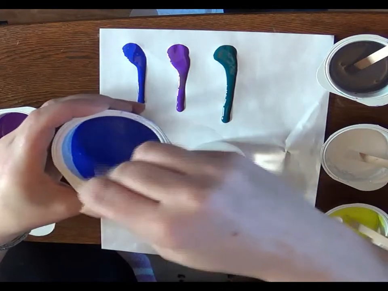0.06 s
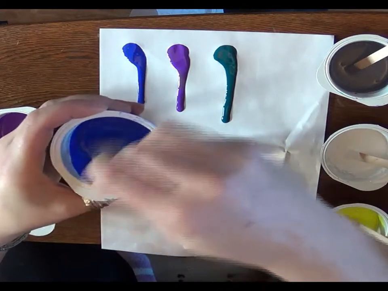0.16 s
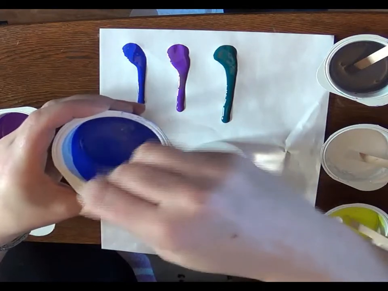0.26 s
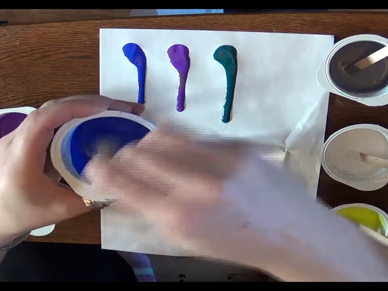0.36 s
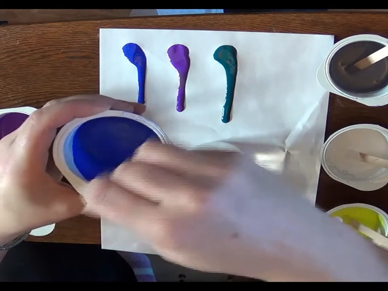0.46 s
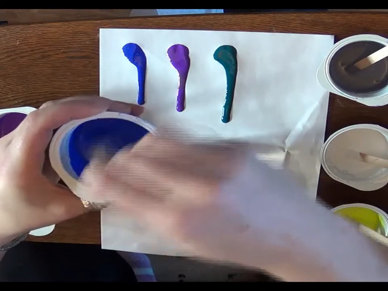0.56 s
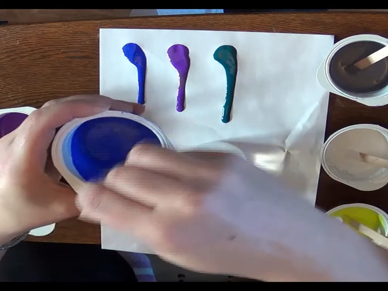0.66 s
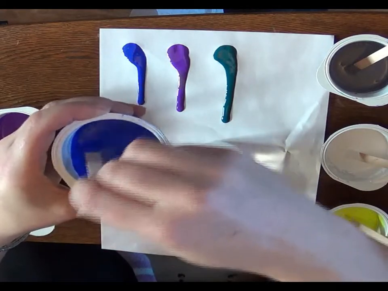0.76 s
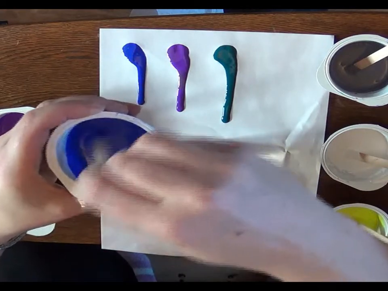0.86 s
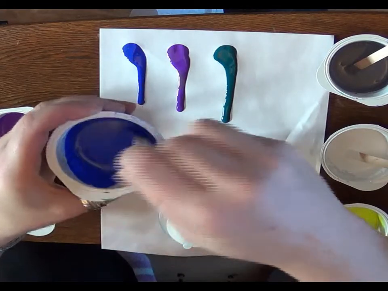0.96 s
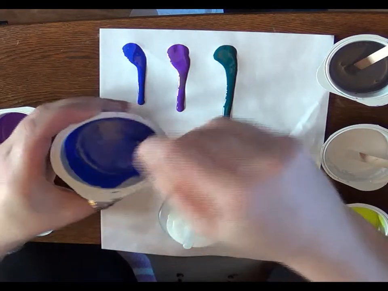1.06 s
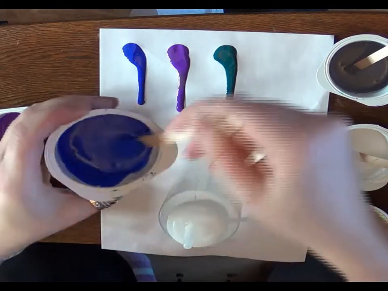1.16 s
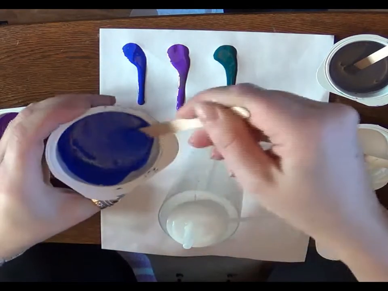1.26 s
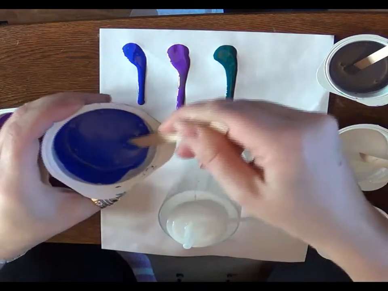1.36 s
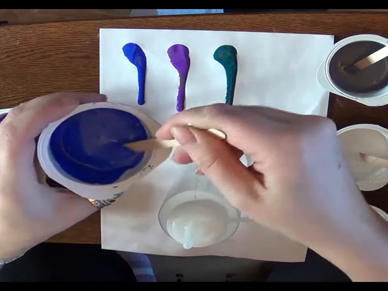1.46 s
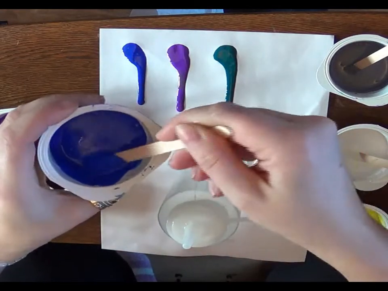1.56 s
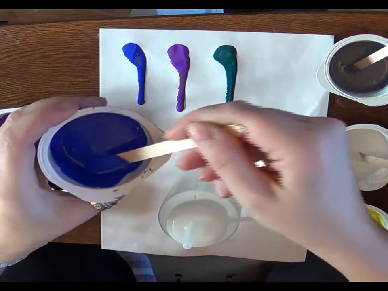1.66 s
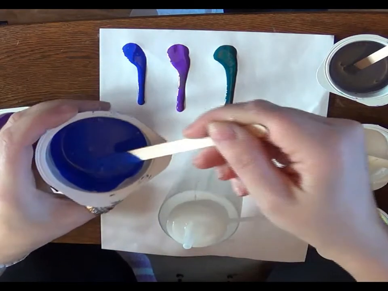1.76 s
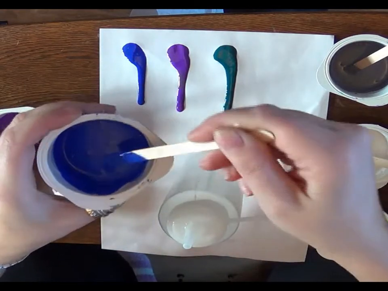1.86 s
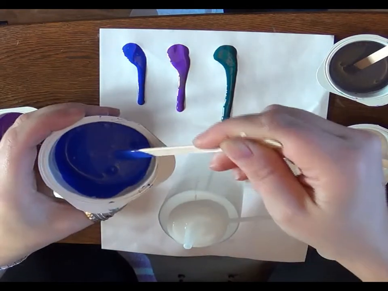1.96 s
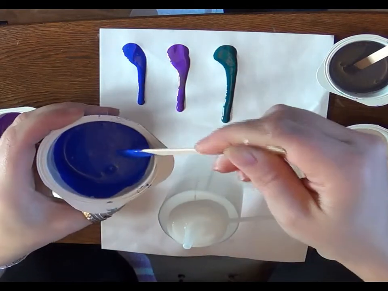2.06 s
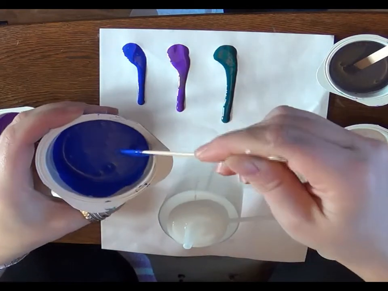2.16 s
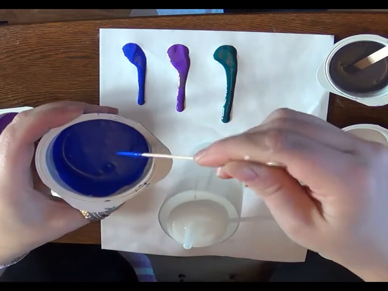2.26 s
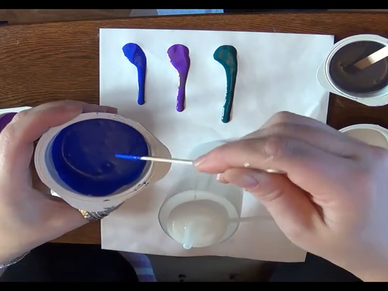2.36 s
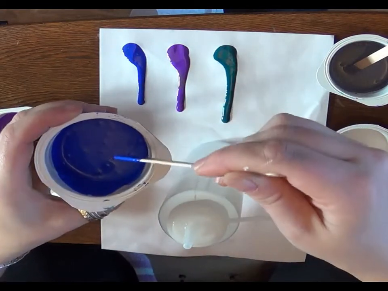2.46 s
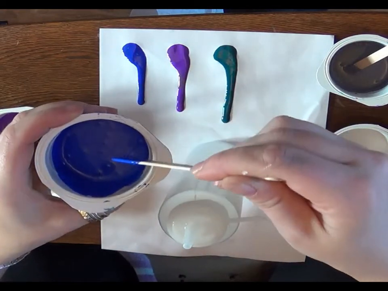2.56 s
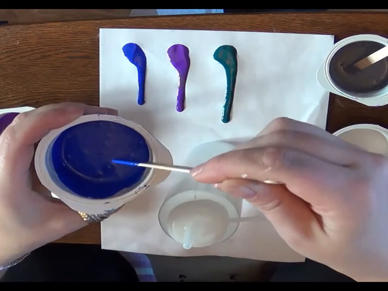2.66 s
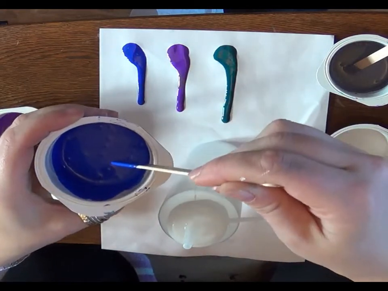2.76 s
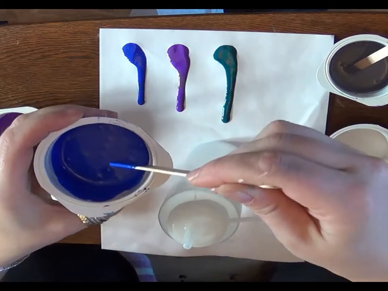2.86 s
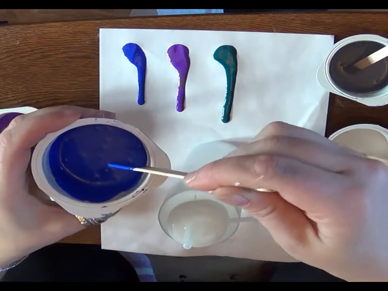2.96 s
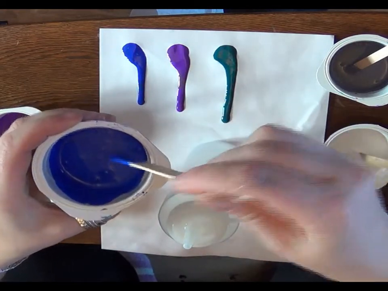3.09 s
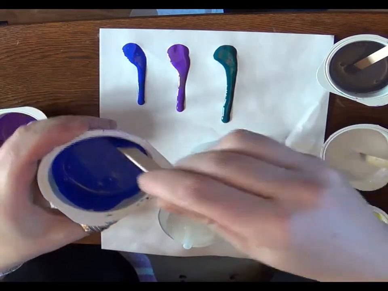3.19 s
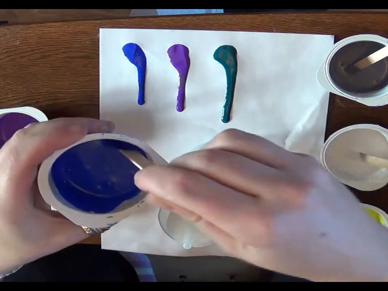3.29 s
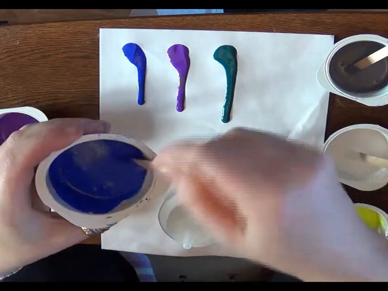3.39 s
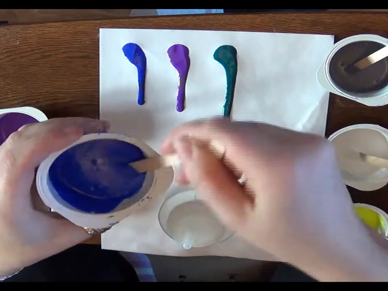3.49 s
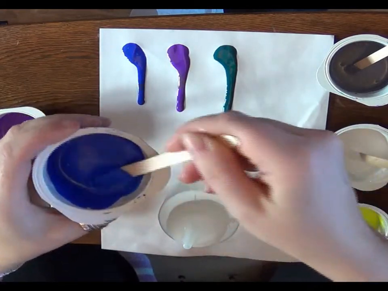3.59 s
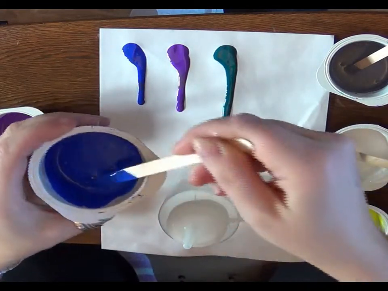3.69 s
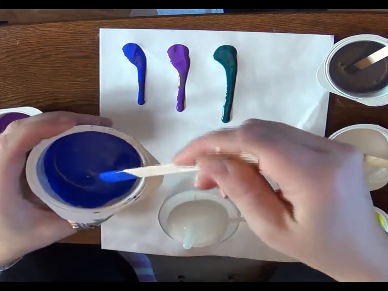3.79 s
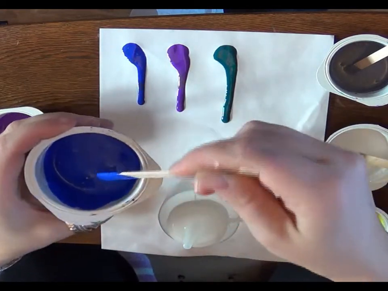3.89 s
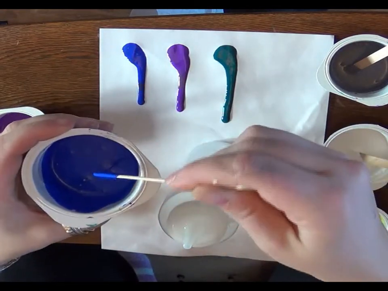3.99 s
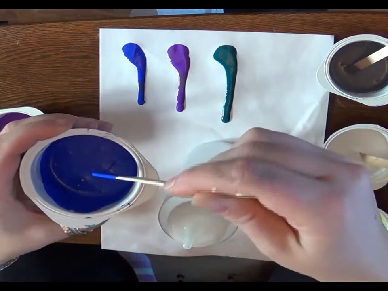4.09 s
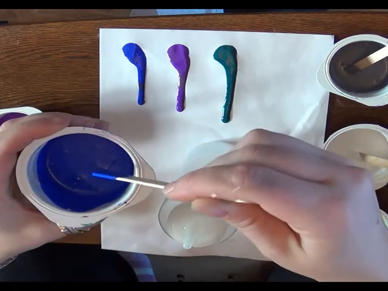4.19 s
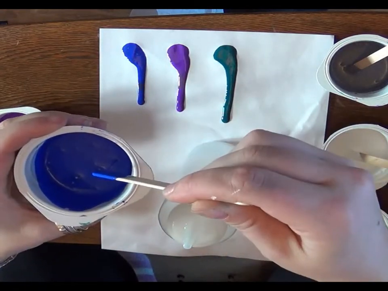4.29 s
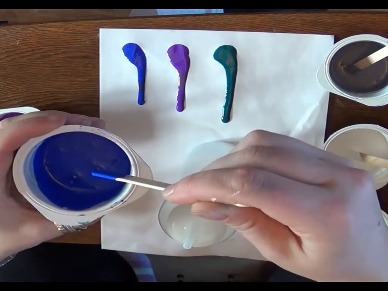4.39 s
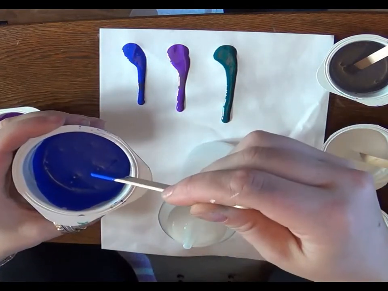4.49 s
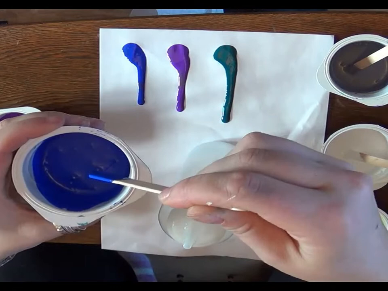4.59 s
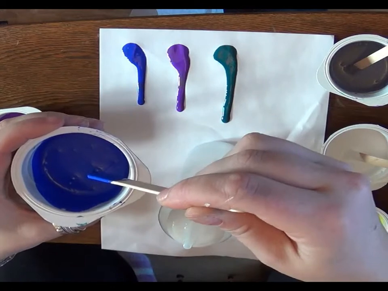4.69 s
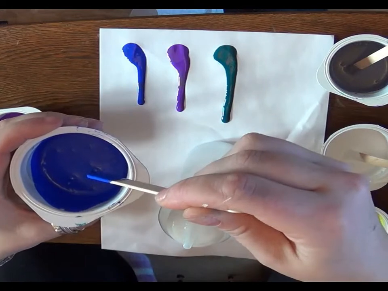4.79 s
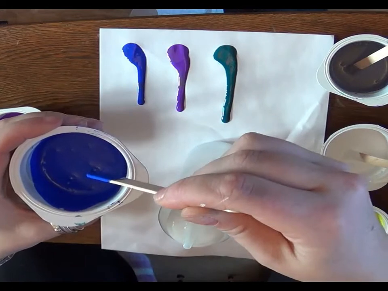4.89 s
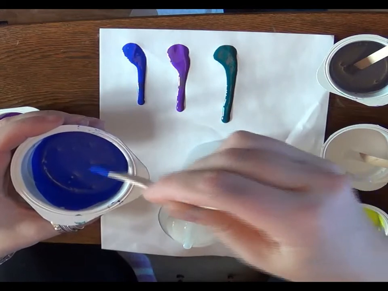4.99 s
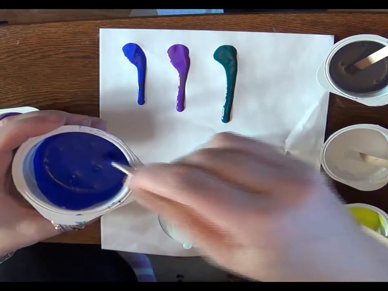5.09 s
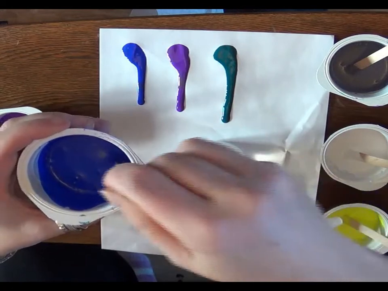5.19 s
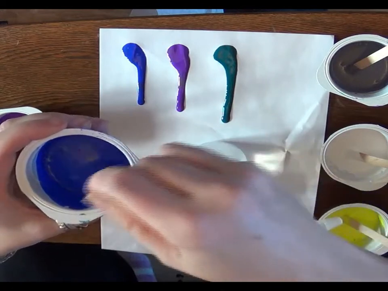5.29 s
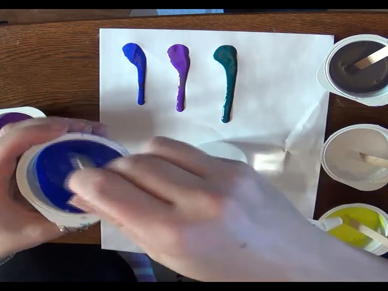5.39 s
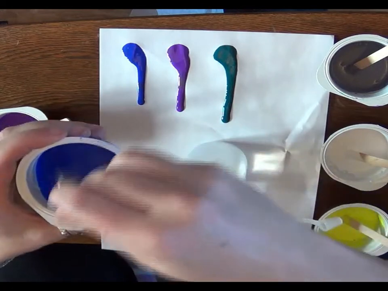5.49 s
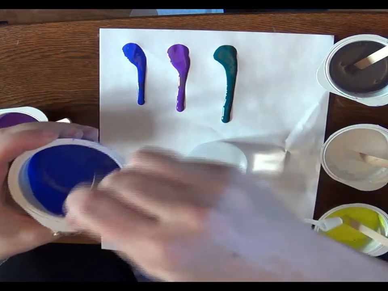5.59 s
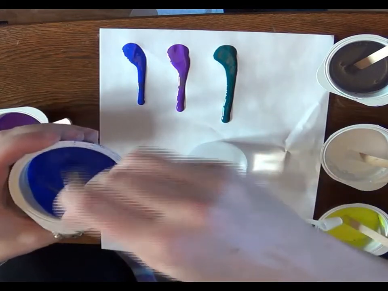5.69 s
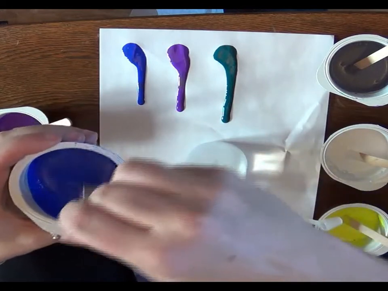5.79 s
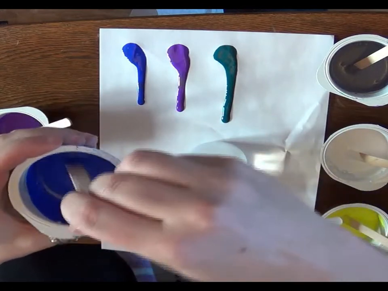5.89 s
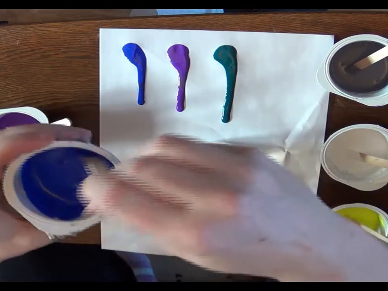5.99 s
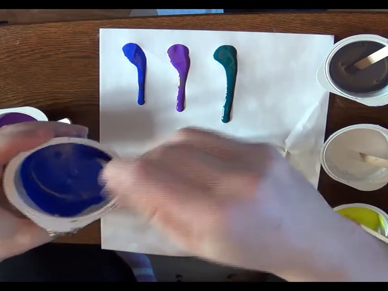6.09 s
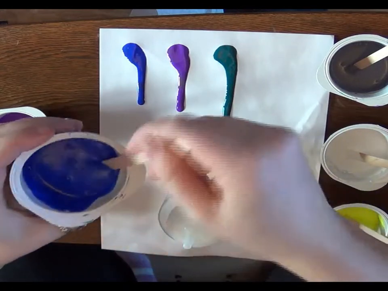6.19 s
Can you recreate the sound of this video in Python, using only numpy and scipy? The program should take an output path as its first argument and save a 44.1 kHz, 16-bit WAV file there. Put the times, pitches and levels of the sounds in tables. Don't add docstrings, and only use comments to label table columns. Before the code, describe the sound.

Brisk scratchy stirring begins at once, with dry wood rubbing thin plastic, small clacks and soft paint slops. One loud crisp tap on the rim leads to brief fading scrapes. Quiet room tone with a distant rattly clock tick follows, broken by a gentle rim wipe, then quiet again until lighter stirring returns. Close stereo microphones, small dry room, slight hiss and a thin high whistle.

```python
import sys
import numpy as np
from scipy import signal
from scipy.fft import rfft, irfft, next_fast_len
from scipy.io import wavfile
from scipy.ndimage import uniform_filter1d

SR = 44100
rng = np.random.default_rng(int(sys.argv[2]) if len(sys.argv) > 2 else 0)


def magnitude_from_level(level_db):
    exponent = np.asarray(level_db, float) / 20
    return 10 ** exponent


def generate_wav(signal):
    frames = np.transpose(np.atleast_2d(signal))
    scaled = np.clip(frames, -1, 1) * 32767
    pcm = np.round(scaled).astype(np.int16)
    wavfile.write(sys.argv[1], SR, pcm)


N = 275625

# (f/Hz, level/dB, t60/s)
POT_MODES = [(482, -3.5, 0.021), (684, -1.5, 0.028), (815, -5, 0.058), (1150, -7, 0.069), (1376, 5, 0.031),
             (1595, -2.5, 0.048), (1877, 0, 0.055), (2280, 6.5, 0.045), (2830, 3, 0.0088),
             (3446, -10.5, 0.063), (3950, 12.5, 0.02), (4345, 9, 0.036), (4760, 1, 0.075),
             (5420, 4.5, 0.013), (6090, 8.5, 0.019), (7060, 6.5, 0.0054), (9200, 14, 0.0023),
             (9270, 9.5, 0.0071), (10400, -10, 0.016), (7550, 1.5, 0.015), (12200, -3, 0.0098),
             (12800, 1, 0.013), (14300, -38, 0.012)]
BITE_S = 0.0035


def unit(x):
    return x / np.sqrt(np.mean(x ** 2))


def colour(x, table, gain=magnitude_from_level):
    hz, value = np.transpose(table)
    size = next_fast_len(x.shape[-1])
    f = np.maximum(np.arange(size // 2 + 1) * SR / size, 1)
    curve = gain(np.interp(np.log(f), np.log(hz), value))
    return irfft(rfft(x, size) * curve, size)[..., :x.shape[-1]]


def walk(rate):
    k = int(SR / rate)
    held = np.repeat(rng.standard_normal(4000), k)[:N]
    return 1.5 * uniform_filter1d(uniform_filter1d(held, k), k)


def ring(hz, db, t60, phase, length=0.12):
    t = np.arange(int(length * SR))[:, None] / SR
    decay = np.exp(-np.log(1000) * t / t60)
    return np.sum(magnitude_from_level(db) * decay * np.sin(2 * np.pi * hz * t + phase), axis=1)


def favour(hz, centre_hz, octaves, lift_db):
    return lift_db * np.exp(-(np.log2(hz / centre_hz) / octaves) ** 2)


def add(track, s, sound):
    i = int(s * SR)
    track[i:i + len(sound)] += sound[:len(track) - i]


def strokes():
    # (t/s, length/s, drag at bite/dB, drag at lift/dB, wall ring relative to drag/dB)
    stir_first = [(0, 0.011, -22, -29.5, -3), (0.015, 0.036, -26.5, -33, -12),
                  (0.057, 0.027, -32.5, -36, -1.5), (0.088, 0.085, -29.5, -34, -9),
                  (.18, 0.025, -34, -38.5, -9), (0.204, 0.029, -28, -34.5, -14),
                  (0.233, 0.043, -41, -32, -12), (0.281, 0.073, -28, -35, -15),
                  (0.362, 0.042, -39.5, -32, -16), (0.409, 0.015, -43, -41, -3),
                  (0.423, 0.037, -42, -27.5, -9), (0.479, 0.06, -30.5, -30, -12),
                  (0.546, 0.031, -40, -31.5, -19), (0.629, 0.03, -35, -38, -7),
                  (0.667, 0.011, -36, -39, -6), (0.674, 0.049, -29.5, -33, -15),
                  (0.729, 0.03, -35.5, -41.5, -14), (0.764, 0.0054, -31, -34, -2),
                  (.775, 0.025, -30.5, -31, -6), (0.829, 0.033, -34, -33, -15),
                  (0.929, 0.051, -35.5, -29, -22), (0.97, 0.14, -34.5, -39, -11.5),
                  (1.115, 0.061, -30.5, -41, -10), (1.186, 0.025, -51, -34, -7.5)]
    wipes = [
        (1.301, 0.06, -35, -48.5, -3.5),
        (1.367, 0.037, -39.5, -29, -6.5),
        (1.406, 0.11, -31.5, -50.5, -11),
        (1.533, 0.077, -46.5, -45, -6.5),
        (3.293, 0.14, -50, -35, -8.5),
        (3.441, 0.134, -36.5, -39.5, -7.5),
        (3.578, 0.05, -40, -39, -9),
        (3.632, .03, -42, -57, -10),
    ]
    stir_again = [(5.171, 0.033, -47, -35, -7), (5.207, 0.054, -31.5, -40, -8.5),
                  (5.265, .016, -46, -38, -4), (5.28, 0.016, -33, -33, -2.5),
                  (5.302, 0.11, -35, -41.5, -11.5), (5.423, 0.056, -49, -35, -7),
                  (5.55, 0.048, -39, -33.5, -13), (5.604, 0.055, -30, -42, -14),
                  (5.668, 0.068, -40, -45, -6.5), (5.745, 0.067, -42.5, -32.5, -23),
                  (5.818, 0.042, -39, -27, -30), (5.88, 0.02, -36, -35, -9), (6.043, 0.061, -40.5, -39, -1),
                  (6.105, 0.07, -39, -38, -3), (6.166, 0.0092, -32, -29, -5), (6.18, 0.012, -31, -31, -3),
                  (6.199, 0.024, -32, -36, -1), (6.232, .03, -28.5, -42, -7)]
    lift_s, arch_db_per_s = 0.0067, 9.5
    trail_db, trail_s = -12.5, 0.021
    push, wall = np.zeros((2, N))
    for s, length, bite_db, lift_db, wall_db in stir_first + wipes + stir_again:
        t = np.arange(int((length + 0.12) * SR)) / SR
        along = np.minimum(t / length, 1)
        db = bite_db + (lift_db - bite_db) * along + arch_db_per_s * length * np.sin(np.pi * along)
        after = np.maximum(t - length, 0)
        stroke = magnitude_from_level(db) ** 2 * np.minimum(t / BITE_S, 1)
        stroke *= np.maximum(1 - after / lift_s, magnitude_from_level(trail_db) ** 2 * np.exp(-after / trail_s))
        add(push, s, stroke)
        add(wall, s, stroke * magnitude_from_level(wall_db) ** 2)
    return push, wall


def scrape():
    # (t/s, favoured wall f/Hz, wall focus level/dB, edge/0 flat to 1 sharp)
    touches = [
        [(0, 1590, 33, 0.42), (.12, 2120, -11, 0.6), (.3, 2310, 16, 0.41), (.37, 1840, 12, 0.71),
         (.48, 2170, -14, 0.5), (.7, 2210, 9, 0.52), (.77, 1720, -19, 0.34), (.95, 2200, 13, 0.46),
         (1.2, 1950, 22, 0.35)],
        [(1.3, 2110, -7, 0), (1.45, 1920, 9, 0.048), (1.55, 2210, 5, 0.34), (1.65, 2270, 21, 0.81)],
        [(3.29, 2190, 12, 0.65), (3.42, 2280, 22, 0.58), (3.49, 2150, 5, 0.45), (3.54, 1940, 9, 0.67),
         (3.62, 1910, 9, 0.44)],
        [(5.17, 2050, 4, 0.12), (5.3, 1900, 8, 0.33), (5.4, 2180, 11, 0.33), (5.5, 2290, -6, 0.37),
         (5.56, 1870, 21, 0.54), (5.73, 2000, 9, 0.57), (5.85, 2270, 15, 0.43), (6.0, 2270, 19, 0.51),
         (6.25, 2360, 6, 0.31)],
    ]
    # (f/Hz, level/dB)
    grit = [(300, -42), (1000, -21.5), (2500, -3.5), (3400, -9.5), (5200, -4.5), (9000, -5), (13000, -0.5),
            (15000, -6.5), (16500, -52)]
    wander_db, wall_wander_db = 2.5, 5.5
    cup_db, drag_db, hiss_db = -5.5, -1.0, 1.5
    t = np.arange(N) / SR
    push, wall = strokes()
    s, *touch = np.concatenate(touches).T
    wall_hz, focus_db, edge = (np.interp(t, s, column) for column in touch)
    cup_hz = 4200 * (1 + 0.05 * walk(9.6))
    hiss_hz = 8350 + (11400 - 8350) * edge
    hiss_share_db = -8.5 + (-2.5 + 8.5) * edge
    fine = push * np.minimum(magnitude_from_level(hiss_share_db) ** 2, 0.8)
    drag = push - fine

    grain_db = 1.5 * rng.exponential(size=N) + 1.1 * walk(200)
    slips = unit(rng.standard_normal(N) * magnitude_from_level(grain_db))
    sound, power = np.zeros((2, 2, N))
    for hz, db, t60 in POT_MODES:
        radius = np.exp(-np.log(1000) * 2.3 / (t60 * SR))
        resonance = [1, -2 * radius * np.cos(2 * np.pi * hz / SR), radius ** 2]
        mode = unit(signal.lfilter([1, 0, -1], resonance, slips))
        high = int(hz > 3000)
        if high:
            gain = magnitude_from_level(0.7 * db + favour(hz, cup_hz, 0.4, 4) + favour(hz, hiss_hz, 0.3, 4))
        else:
            gain = magnitude_from_level(db + favour(hz, wall_hz, 0.15, focus_db)) * np.clip(hz / 2100, 0.52, 1) ** 2
        gain *= magnitude_from_level((wander_db if high else wall_wander_db) * walk(35))
        sound[high] += gain * mode
        power[high] += gain ** 2
    low, cup = sound / np.sqrt(power)

    bright = unit(colour(slips, grit)) + magnitude_from_level(cup_db) * cup
    middle = colour(bright, [(2000, 0), (8500, 0), (9500, -40)])
    top = unit(bright - middle)
    finest = colour(top, [(11300, -40), (12300, 0)])
    top += (np.clip((hiss_hz - 8500) / 1800, 0.4, 1.4) - 1) * finest
    out = magnitude_from_level(drag_db) * np.sqrt(drag) * unit(middle) + np.sqrt(wall) * unit(low)
    return out + magnitude_from_level(hiss_db) * np.sqrt(fine) * top


def patchy(x):
    patch_db, rate_hz, region_hz = 1.8, 60, 1500
    size = next_fast_len(N)
    spectrum = rfft(x, size)
    f = np.arange(size // 2 + 1) * SR / size
    out = x.copy()
    for hz in np.arange(3000, 16000, region_hz):
        region = irfft(spectrum * np.maximum(1 - np.abs(f - hz) / region_hz, 0), size)[:N]
        out += (magnitude_from_level(patch_db * walk(rate_hz) - 0.16 * patch_db ** 2) - 1) * region
    return out


def narrow_bursts(table, width):
    out = np.zeros(N)
    for s, length, db, hz in table:
        slips = rng.standard_normal(8192) * magnitude_from_level(2.5 * rng.exponential(size=8192))
        band = signal.butter(1, [hz * (1 - width), hz * (1 + width)], "band", fs=SR, output="sos")
        t = np.arange(len(slips)) / SR
        shape = np.clip(np.minimum(t, length + BITE_S - t) / BITE_S, 0, 1)
        add(out, s, magnitude_from_level(db) * shape * unit(signal.sosfilt(band, slips)))
    return out


def edge_chatter():
    # (t/s, length/s, level/dB, f/Hz)
    chatters = [(.003, .009, -38, 12200), (0.034, 0.0072, -32, 5000), (.098, 0.0073, -42, 3900),
                (.12, .02, -36, 8500), (0.206, .008, -34, 12500), (0.22, 0.011, -37, 6800),
                (0.234, 0.004, -45, 2000), (.255, 0.013, -38, 7100), (.31, 0.027, -35, 8800),
                (0.447, 0.013, -34.5, 8700), (.678, .01, -38, 8000), (0.703, .03, -35, 12000),
                (0.832, .012, -37, 6460), (1.04, .03, -48, 11500), (1.205, 0.022, -44, 5070),
                (1.388, 0.022, -34, 4500), (3.34, .06, -54, 11800), (3.398, 0.03, -38, 12400),
                (3.444, 0.026, -52, 2150), (3.5, .06, -48, 5800), (5.342, .03, -42, 9200),
                (5.58, 0.022, -40, 12500), (5.605, 0.017, -36, 11700), (5.608, .02, -38.5, 6500),
                (5.79, 0.023, -39, 7500), (5.832, .014, -32, 12800), (5.834, .012, -44, 9700),
                (5.844, 0.011, -34.5, 4020), (5.849, 0.011, -28.5, 12600), (6.13, 0.034, -41, 12500),
                (.072, 0.005, -38, 2400), (.183, 0.0067, -33, 1400), (.368, 0.0091, -35, 1680),
                (.492, .006, -40, 1800), (.778, .006, -36, 5000), (.966, .006, -35, 4020),
                (1.103, .004, -40, 6500), (5.29, .008, -45, 1410), (5.568, .006, -43, 1400),
                (5.671, 0.0075, -45, 1310), (5.757, 0.0046, -38, 1400)]
    return narrow_bursts(chatters, 0.047)


def wall_singing():
    # (t/s, length/s, level/dB, f/Hz)
    sings = [(.055, 0.058, -50, 2340), (.2, .035, -42, 2450), (.55, .03, -44, 4340), (.94, 0.16, -53, 4230),
             (1.0, 0.091, -45, 12500), (1.115, 0.019, -40, 4260), (1.19, 0.039, -48, 1900),
             (1.375, 0.037, -41, 1625), (3.33, 0.066, -52, 4570), (3.36, 0.084, -49, 2250),
             (3.44, 0.029, -41, 2200), (3.47, .08, -47, 3900), (3.48, 0.089, -48, 5750),
             (3.55, .08, -50, 1830), (5.2, 0.025, -45, 2350), (5.56, 0.024, -51, 1220),
             (5.76, 0.078, -49, 2270), (6.047, 0.059, -46, 2150), (6.105, 0.055, -43, 2250),
             (6.165, 0.095, -47, 2260), (3.41, .09, -53, 3000), (3.57, .05, -55, 3030),
             (1.311, 0.017, -37, 1960), (6.015, .03, -49, 1850), (5.18, .06, -50, 1150)]
    return narrow_bursts(sings, 0.014)


def knocks():
    # (t/s, peak level/dB, thud level/dB, snap level/dB, loudest ring f/Hz)
    stick_blows = [(.018, -13, 38, 4, 870), (.037, -19.5, 3, 3, 4700), (.072, -23, -22, -12, 2290),
                   (.182, -16, -1.5, -7.5, 1310), (.226, -18.5, -19, -5, 3950), (.284, -20.5, 17, 4, 6060),
                   (.297, -24, 5, -3, 2280), (.37, -18, 7, -3.5, 1800), (.424, -19.5, 7, -2, 1810),
                   (.481, -25, 12, 3, 2310), (.626, -13.5, 3.5, -2.5, 2430), (.764, -15, 4, -3, 1360),
                   (.871, -9, 6.5, -0.5, 2250), (.963, -11.5, -14, 29, 6550), (5.18, -21.5, 15, 4, 1150),
                   (5.208, -24, -19, -1, 4760), (5.31, -35, 16, 14, 4320), (5.472, -27, -21, -11, 2300),
                   (5.569, -17.5, -2, -11.5, 1250), (5.607, -22, -6, 22, 6750),
                   (5.757, -23.5, -1, -11, 2060), (5.884, -24, 12, 6, 1870),
                   (1.308, -1.5, -62, 4.5, 2210), (1.429, -22, 6, -9, 2170), (1.511, -26, 1, -12.5, 2330),
                (1.59, -40, -16, -5, 2250), (1.613, -29.5, -29, -5, 2440), (3.3, -21.5, -1.5, -3.5, 1470),
                (3.599, -24.5, -31, -9, 1820), (5.994, -12, 13, 64, 7660), (6.01, -18.5, 1, -8.5, 2080),
                (6.045, -33, 9, -10, 2180), (6.071, -31, -25, -19, 2230), (6.107, -34, -12, -21, 2120),
                (6.122, -24.5, -2, -20, 2270)]
    # (f/Hz, level/dB, t60/s)
    stick_modes = [(2660, -2, 0.011), (3200, -3, 0.012), (3570, 8, 0.02), (4930, 3, 0.0066),
                   (5800, 2, 0.0089), (7730, 3, 0.0092), (8300, -2.5, 0.005), (9800, 4, .01),
                   (11500, 4, 0.009)]
    damp, crack_s, contact_s, phase_spread = 1.6, 0.0008, 0.00018, 0.3
    out = np.zeros(N)
    blows = stick_blows
    hz, db, t60 = np.transpose(POT_MODES + stick_modes)
    chance = rng.standard_normal((len(blows), 2, len(hz)))
    t = np.arange(400) / SR
    cracks = colour(rng.standard_normal((len(blows), len(t))),
                    [(1500, 12), (3000, 18), (8000, 6), (11500, -1), (14500, -31)])
    bass_cut = signal.butter(8, 1700, "high", fs=SR, output="sos")
    for (s, peak_db, thud_db, snap_db, ring_hz), (detune, phase), crack in zip(blows, chance, cracks):
        share_db = np.interp(np.log(hz), np.log([1300, 1900, 2900, 4000]), [thud_db, 0, 0, snap_db - 3])
        share_db += favour(hz, ring_hz, 0.24, 7.5)
        share_db -= 14 * np.maximum(np.log2(ring_hz / hz), 0) * (hz > 3000)
        blow = ring(hz * (1 + 0.047 * detune), db + share_db, t60 / damp, phase_spread * phase)
        crack = colour(crack, [(0.42 * ring_hz, -30), (0.9 * ring_hz, 0)])
        blow[:len(t)] += magnitude_from_level(snap_db + 13) * crack * np.exp(-t / crack_s)
        blow[:len(t)] *= np.minimum(t / contact_s, 1) ** 2
        thin = signal.sosfilt(bass_cut, blow)
        blow = thin + magnitude_from_level(min(thud_db - max(snap_db, 0), 0)) * (blow - thin)
        add(out, s + 0.0002, blow * magnitude_from_level(peak_db) / np.max(np.abs(blow)))
    return out


def slops():
    # (t/s, peak level/dB, f/Hz, t60/s)
    thumps = [(0.365, -40, 369, 0.088), (0.5, -36, 363, 0.036), (0.622, -63, 356, 0.08),
              (0.864, -34.5, 410, 0.073), (0.979, -55, 400, 0.12), (1.307, -42.5, 203, 0.15),
              (2.212, -50, 158, 0.08), (3.424, -49, 314, 0.08), (3.835, -43, 157, 0.074),
              (5.881, -29, 162, 0.038), (6.007, -38, 215, 0.06), (6.12, -35, 307, 0.061)]
    swell_s = 0.0066
    out = np.zeros(N)
    for s, db, hz, t60 in thumps:
        thump = ring(hz, db, t60, 0, length=0.18)
        add(out, s, thump * np.minimum(np.arange(len(thump)) / SR / swell_s, 1))
    return out


def churn():
    # (t/s, level/dB)
    swirls = [
        [(0.0, -46.5), (0.4, -47), (0.788, -50.5), (1.096, -52), (1.2, -53)],
        [(5.17, -65), (5.558, -60), (6.012, -52.5), (6.25, -55)],
    ]
    t = np.arange(N) / SR
    lumps = rng.standard_normal(N) * magnitude_from_level(3.1 * walk(40) - 1)
    wash = unit(colour(lumps, [(120, -4.0), (300, -10.0), (800, -9.0), (1200, -18.5)]))
    return wash * sum(magnitude_from_level(np.interp(t, *np.transpose(part), left=-99, right=-99)) for part in swirls)


def clock():
    # (f/Hz, level/dB, t60/s)
    case_modes = [(600, -10, .01), (1300, -5, .009), (1850, -1, .012), (2500, -1, .008), (3200, 0, .008),
                  (3800, 0, .007), (4500, 0, .007), (5600, -5, .005)]
    # (t/s, level/dB)
    steps = [
        (.011, 6),
        (.017, 3.5),
        (.023, -2),
        (.028, 7),
        (.033, -5),
        (.058, -8),
        (.066, 1),
    ]
    first_s, level_db = 0.735, -47
    out = np.zeros(N)
    hz, db, t60 = np.transpose(case_modes)
    for second in range(6):
        for s, step_db in steps:
            detune, scatter, phase = rng.standard_normal((3, len(hz)))
            mode_db = db + 0.95 * scatter + step_db + level_db
            click = ring(hz * (1 + 0.079 * detune), mode_db, t60, 2 * phase)
            add(out, first_s + second + s, click)
    return out


def room(x, t60, gap_s=0.0036):
    t = np.arange(int(0.4 * SR)) / SR
    tail = rng.standard_normal((2, len(t))) * np.exp(-np.log(1000) * t / t60) * (t > gap_s)
    tail = colour(tail, [(300, 3.0), (2000, 0.0), (6000, -6.5), (14000, -9)])
    return signal.fftconvolve(x[None], tail / np.sqrt(np.sum(tail ** 2) / 2), axes=1)[:, :N]


def floor():
    # (f/Hz, level/dB)
    air_colour = [(15, -36), (25, -6.5), (86, 3), (125, 0), (208, -1.5), (232, -2), (312, -2), (534, -3.5),
                  (594, -3), (1160, -5.5), (2160, -6.5), (3310, -10.5), (8480, -12.5), (14100, -16),
                  (15300, -16)]
    # (f/Hz, likeness/0-1)
    alike = [(60, 1), (130, 1), (290, 0.53), (640, 0), (1410, 0), (3100, 0.32), (6820, 0.72), (15000, 0.88)]
    # (f/Hz, rms level/dB)
    whistle = [(75.6, -70), (209, -69), (1700, -74), (2100, -74), (2300, -75), (1300, -76), (800, -77),
               (8452, -73), (8549, -75), (8651, -76), (15525, -77), (15575, -75), (15625, -62),
               (15675, -76)]
    mid, side = colour(rng.standard_normal((2, N)), air_colour + [(15600, -13), (16000, -20.0)])
    mid = colour(mid, alike, lambda c: np.sqrt(1 + np.clip(c, 0, 0.88)))
    side = colour(side, alike, lambda c: np.sqrt(1 - np.clip(c, 0, 0.88)))
    air = unit(np.array([mid + side, mid - side])) * magnitude_from_level(-49 + 0.5 * walk(3.1))
    t = np.arange(N) / SR
    return air + sum(np.sqrt(2) * magnitude_from_level(db) * np.sin(2 * np.pi * hz * t + hz) for hz, db in whistle)


def scene():
    wide_db, room_db = -11.5, -14.5
    rub = patchy(scrape()) + edge_chatter() + wall_singing()
    pot = signal.sosfilt(signal.butter(2, 300, "high", fs=SR, output="sos"), rub + knocks())
    pot += slops() + churn()
    near = room(pot, 0.019, gap_s=0.00051)
    near = colour(near, [(400, -9.5), (1500, -3.5), (6000, -1.5), (13000, 6.5)])
    tick = clock()
    pot_in_room = pot + magnitude_from_level(wide_db) * near + magnitude_from_level(room_db) * room(pot, 0.37)
    return pot_in_room + 0.5 * tick + room(tick, 0.23) + floor()


def low_pass(x):
    return signal.sosfilt(signal.butter(12, 16110, fs=SR, output="sos"), x)


def record(dry):
    top_cut = signal.ellip(10, 0.3, 70, 15780, fs=SR, output="sos")
    return low_pass(signal.sosfilt(top_cut, dry))


dry = scene()
out = record(dry)
generate_wav(out)
```